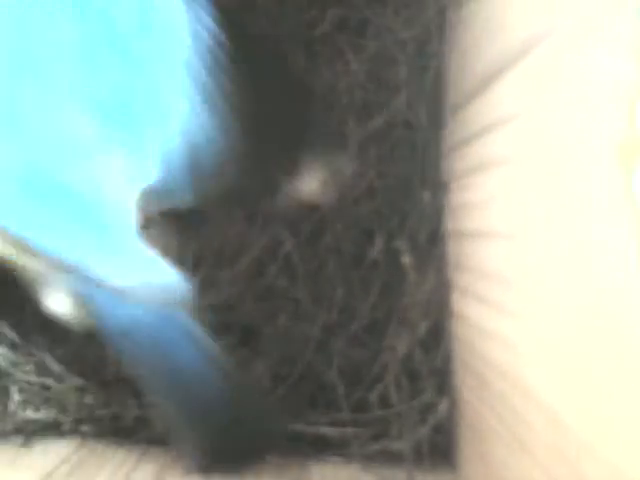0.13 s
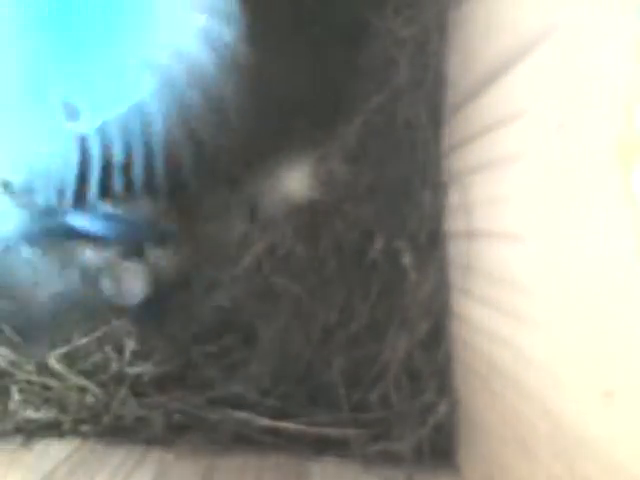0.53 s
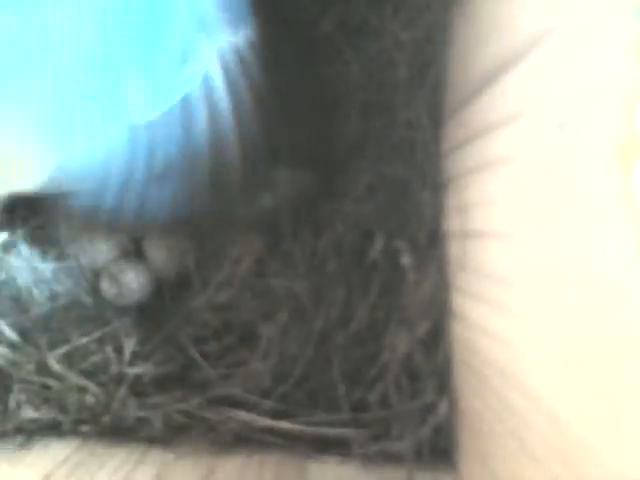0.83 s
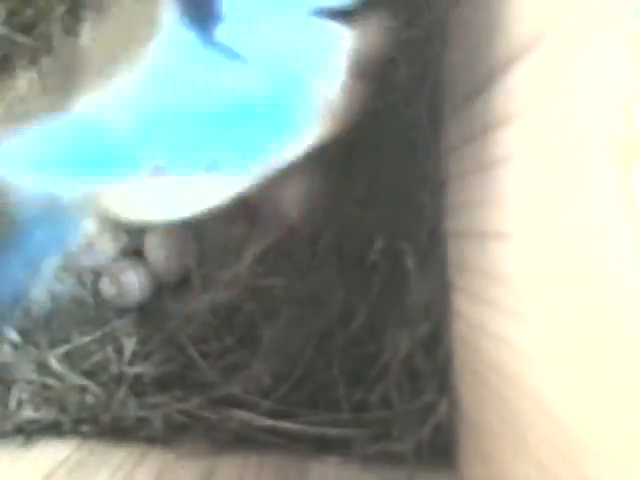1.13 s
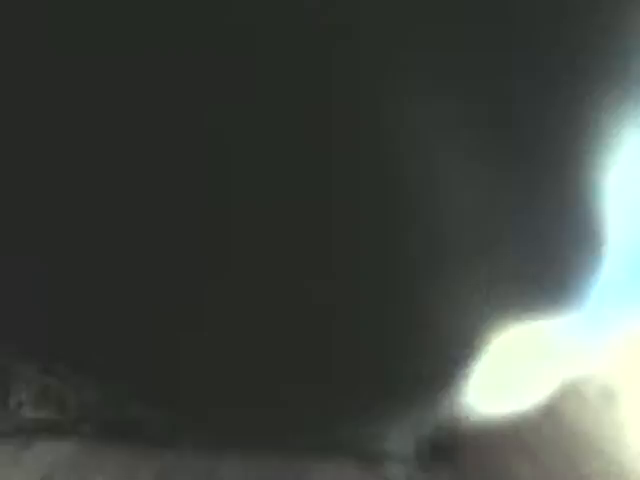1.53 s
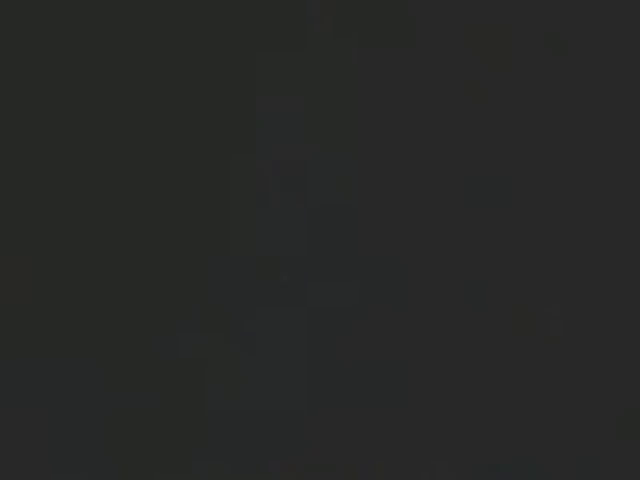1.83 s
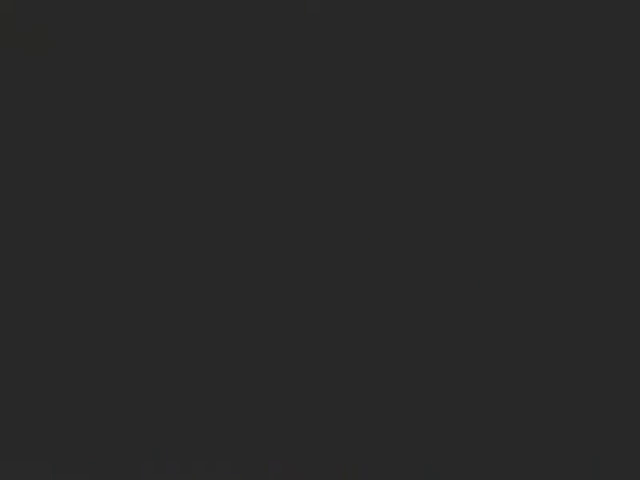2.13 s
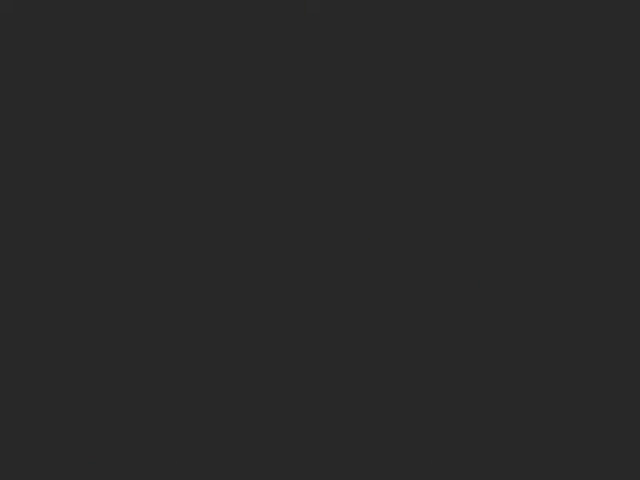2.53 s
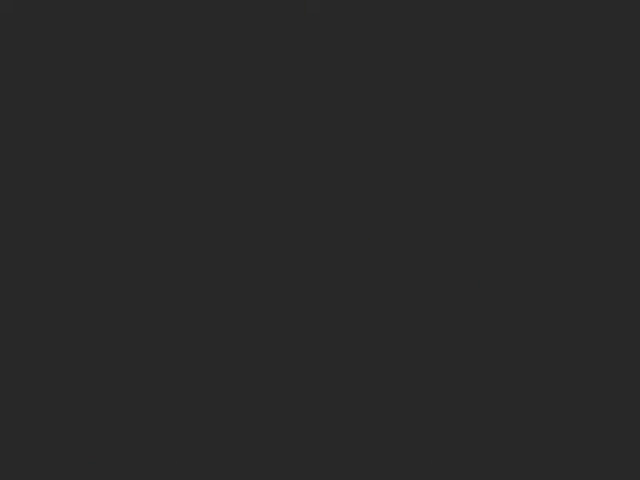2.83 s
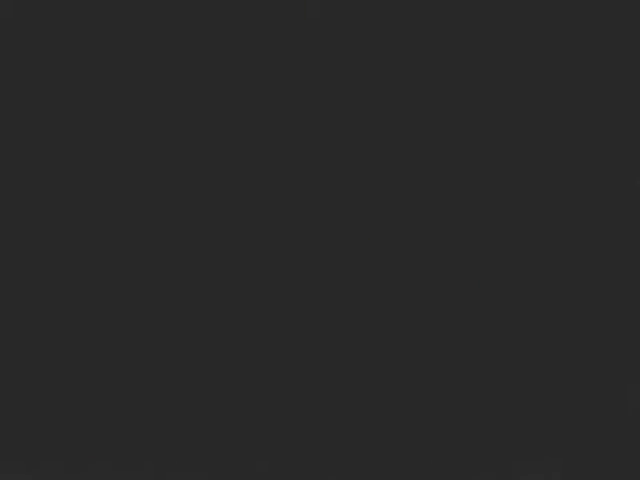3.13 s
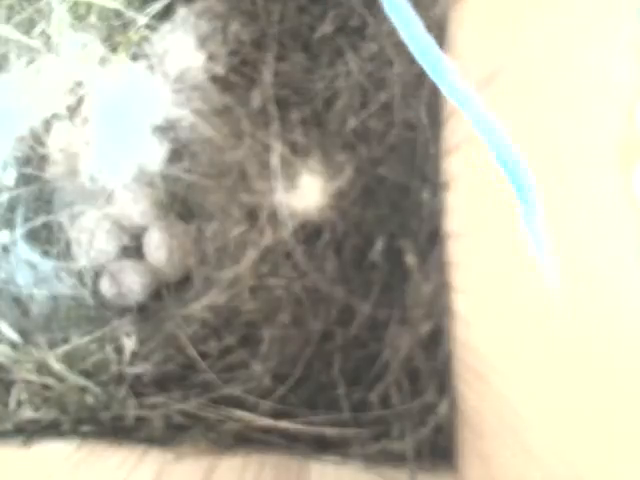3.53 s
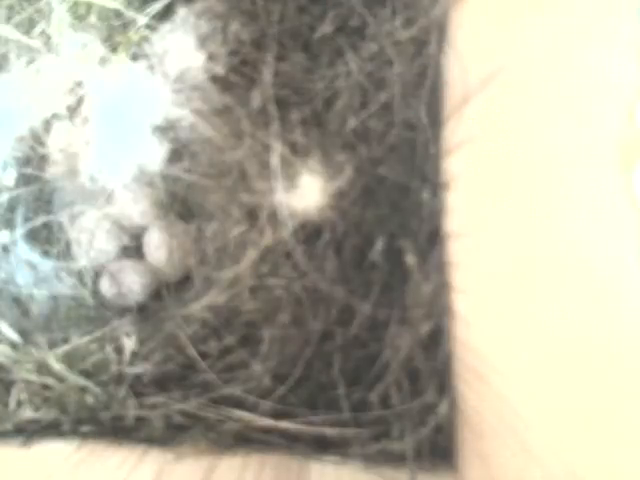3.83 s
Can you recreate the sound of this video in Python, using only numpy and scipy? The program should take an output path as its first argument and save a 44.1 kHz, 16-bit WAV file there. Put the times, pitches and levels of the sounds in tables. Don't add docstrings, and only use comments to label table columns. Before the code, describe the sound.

A small bird scuffles in a wooden nest box, close-miked: feathery hiss, woody rubbing and knocks at 0.3, 0.74 and 1.27 s, while a bird outside gives a falling whistle and quick trill until 0.5 s. Climbing bumps boom at 1.5-1.6 s. Near quiet follows, with faint ticks. Claws tap rapidly at 3.15-3.32 s, wings flutter away by 3.65 s, and a distant warble grows at the end.

```python
import sys
import numpy as np
from scipy import signal
from scipy.io import wavfile
from scipy.ndimage import uniform_filter1d

SR = 44100
rng = np.random.default_rng(int(sys.argv[2]) if len(sys.argv) > 2 else 0)


def to_linear_factor(level_db):
    exponent = np.asarray(level_db, float) / 20
    return 10 ** exponent


def master(y):
    cut = np.clip(np.atleast_2d(y).T, -1, 1)
    pcm = np.round(cut * 32767)
    wavfile.write(sys.argv[1], SR, pcm.astype(np.int16))


N = 176400


def rms_one(x):
    return x / np.sqrt(np.mean(x ** 2) + 1e-20)


def delayed(x, seconds):
    return np.pad(x, (int(seconds * SR), 0))[:N]


def drift(rate):
    step = 40
    r = np.exp(-2 * np.pi * rate * step / SR)
    slow = signal.lfilter([1], [1, -2 * r, r * r], rng.standard_normal(N // step + 2002))[2000:]
    return np.interp(np.arange(N) / step, np.arange(len(slow)), rms_one(slow))


def fade(t60):
    return to_linear_factor(-60 / (t60 * SR))


def ring(x, hz, t60):
    r, w = fade(t60), 2 * np.pi * hz / SR
    return signal.lfilter([0, np.sin(w)], [1, -2 * r * np.cos(w), r * r], x + 1e-18)


def peak(x, hz, width):
    r = np.exp(-np.pi * width / SR)
    top = np.array([1, 0, -1]) * (1 - r * r) / 2
    return signal.lfilter(top, [1, -2 * r * np.cos(2 * np.pi * hz / SR), r * r], x)


def cut(x, hz, kind, order=2):
    return signal.sosfilt(signal.butter(order, hz, kind, fs=SR, output="sos"), x)


def coloured(x, spectrum, patchy_db):
    out, sign = 0, 1
    hz, db = np.transpose(spectrum)
    edges = 28 * 2 ** np.arange(0, 9.4, 1 / 3)
    for low, high in zip(edges, edges[1:]):
        level = np.interp(np.log(low * high) / 2, np.log(hz), db)
        sign = -sign
        out = out + sign * to_linear_factor(level + patchy_db * drift(7.9)) * cut(x, [low, high], "band")
    return rms_one(out)


def grains(per_s, spread_db):
    sizes = to_linear_factor(spread_db * np.minimum(rng.exponential(1, N), 5)) * rng.choice([-1, 1], N)
    clicks = sizes * (rng.random(N) < per_s / SR)
    return rms_one(clicks + 0.07 * rng.standard_normal(N))


# [t/s, level/dB]
BUSTLE_LEVEL = [(0, -40), (.05, -59), (.12, -49), (1.15, -54), (1.38, -78), (1.5, -59.5), (1.63, -76.5),
                (1.7, -75), (1.9, -86.5), (3.09, -96.5), (3.14, -53), (3.45, -44.5), (3.52, -88)]


def strokes(rows, bustle_db):
    t = np.arange(N) / SR
    bustle = np.interp(t, *np.transpose(BUSTLE_LEVEL))
    power = to_linear_factor(bustle + bustle_db + 3.05 * drift(110)) ** 2
    for s, half, db in rows:
        near = slice(max(int((s - .1) * SR), 0), int((s + 0.14) * SR))
        side = np.where(t[near] < s, half * 0.89, half)
        away = np.abs(t[near] - s) / side
        power[near] += to_linear_factor(db - 12 * away ** 2.54) ** 2
    return np.sqrt(power)


def struck(rows, modes, spread_db, scrape_s, rough):
    s, db = np.transpose(rows)
    luck = rng.standard_normal((len(s), len(modes)))
    out = 0
    for k, (hz, level_db, t60) in enumerate(modes):
        clicks = np.zeros(N)
        clicks[(s * SR).astype(int)] = to_linear_factor(db + level_db + spread_db * luck[:, k]) * (-1) ** k
        scrape = signal.lfilter([1], [1, -fade(scrape_s)], clicks + 1e-18) * rng.standard_normal(N)
        out = out + ring(clicks + rough * scrape, hz, min(t60, .07))
    return out


def cracks(rows, gain_db, t60, low_hz):
    clicks = np.zeros(N)
    for s, db, *_ in rows:
        clicks[int(s * SR)] = to_linear_factor(db + gain_db)
    bright = cut(cut(rng.standard_normal(N), low_hz, "high"), 10000, "low", order=4)
    return signal.lfilter([1], [1, -fade(t60)], clicks + 1e-18) * bright


def tone(out, s, hz, gain):
    i = int(s * SR)
    n = min(len(hz), N - i)
    sine = np.sqrt(2) * gain * np.sin(2 * np.pi * np.cumsum(hz) / SR)
    return np.pad(sine[:n], (i, N - i - n)) + out


# [f/Hz, level/dB per Hz]
RUMBLE_COLOUR = [(18, -83), (30, -47), (58, -25), (287, -4.5), (499, -31), (1010, -32), (1590, -37.5),
                 (16000, -49.5)]
# [f/Hz, level/dB]
WHINE_TONES = [(2627, -93.5), (5286, -98.5), (7900, -98)]


def background():
    t = np.arange(N) / SR
    whine = 0
    for hz, db in WHINE_TONES:
        whine = whine + np.sqrt(2) * to_linear_factor(db + 2 * drift(10)) * np.sin(2 * np.pi * hz * t)
    box = to_linear_factor(-83.5) * rms_one(peak(rng.standard_normal(N), 1200, 130))
    return to_linear_factor(-62.5) * coloured(rng.standard_normal(N), RUMBLE_COLOUR, patchy_db=0) + whine + box


# [t/s, length/s, f/Hz, level/dB]
SMALL_PEEPS = [
    (3.494, 0.015, 1980, -49.5),
    (3.543, 0.026, 2100, -70),
    (3.908, 0.018, 10400, -64),
    (2.31, .02, 3700, -78),
    (.06, .012, 7500, -44),
    (1.566, 0.024, 1750, -30.5),
    (1.568, .018, 1560, -38),
    (2.55, .02, 1000, -68),
]


def far_birds():
    start_s, pitch_hz, swing_hz, swings_per_s = 3.865, 2170, 350, 42
    t = np.arange(N - int(start_s * SR)) / SR + start_s
    swing = signal.sawtooth(2 * np.pi * (swings_per_s * (t - 3.929) + 0.686), .7)
    swing = swing * np.clip((t - start_s - .03) * 200, 0, 1)
    gain = to_linear_factor(-54 + 50 * (t - 4)) * np.clip((t - start_s) * 25, 0, 1) ** 2
    gain = gain * to_linear_factor(6.1 * drift(78.3)[:len(t)])
    out = tone(0, start_s, pitch_hz + swing_hz * uniform_filter1d(swing, size=90), gain)
    out = out + to_linear_factor(-7) * (delayed(out, 0.0075) + delayed(out, 0.0038))
    for s, length, hz, db in SMALL_PEEPS:
        u = np.linspace(0, 1, int(length * SR))
        out = tone(out, s, hz * (1 + 0.046 * u), to_linear_factor(db) * np.sin(np.pi * u))
    return out


# [t/s, f/Hz, level/dB]
LEAD_WHISTLE = [
    (0, 8200, -37),
    (.014, 8180, -33),
    (.024, 7500, -33),
    (.028, 7300, -42),
    (.04, 7300, -44),
]
# [offset t/s, length/s, from f/Hz, to f/Hz, level/dB]
TRILL_SLIDES = [
    (0, .024, 5450, 6050, -2),
    (.012, .021, 4300, 6700, 0),
    (.026, .017, 5200, 6800, -1),
    (.036, .014, 5400, 6700, -5),
    (.009, .015, 6800, 8800, -6),
    (.003, .012, 6700, 8300, -9),
    (.02, .014, 7000, 8000, -9),
    (.03, .016, 6500, 6700, -6),
]


def singer():
    s, hz, db = np.transpose(LEAD_WHISTLE)
    t = np.arange(int(s[-1] * SR)) / SR
    gain = to_linear_factor(np.interp(t, s, db)) * np.minimum((t[-1] - t) * 200, 1)
    out = tone(0, 0, np.interp(t, s, hz), gain)
    for k, luck in enumerate(rng.standard_normal((5, len(TRILL_SLIDES)))):
        note_s = .074 + .0876 * k
        for (offset, length, from_hz, to_hz, db), z in zip(TRILL_SLIDES, luck):
            u = np.linspace(0, 1, int(length * SR))
            pitch = (from_hz + (to_hz - from_hz) * u) * (1 + 0.013 * z)
            out = tone(out, note_s + offset, pitch, to_linear_factor(-38.5 + db + 1.5 * z) * np.sin(np.pi * u))
    out = out * to_linear_factor(4 * drift(150))
    return out + to_linear_factor(-12) * (delayed(out, .0045) + delayed(out, .0087))


# [t/s, level/dB, f/Hz, t60/s]
AIR_BOOMS = [
    (1.483, -20.5, 315, 0.055),
    (1.508, -33.5, 270, 0.097),
    (1.547, -28, 270, 0.088),
    (1.612, -22, 290, 0.058),
    (1.765, -40.5, 196, 0.13),
    (2.511, -50, 201.4, 0.082),
    (3.173, -29.5, 252, 0.13),
    (3.231, -26, 252, 0.088),
    (3.344, -30.5, 273.5, 0.111),
    (3.915, -49, 190, 0.13),
]


def booms():
    t = np.arange(SR // 4) / SR
    out = 0
    for s, db, hz, t60 in AIR_BOOMS:
        out = tone(out, s, hz + 0 * t, to_linear_factor(db - 60 * t / t60) * np.minimum(t / .006, 1) ** 2)
    return out


# [t/s, level/dB]
AIR_PUFFS = [
    (0.011, -38.5),
    (0.308, -35),
    (0.511, -34.5),
    (0.74, -25),
    (0.938, -39.5),
    (1.488, -28.5),
    (1.575, -20.5),
    (3.376, -37),
    (3.447, -29),
]
# [t/s, half length/s, level/dB]
BOX_SWAYS = [
    (1.42, 0.024, -60),
    (1.48, 0.019, -41.5),
    (1.58, 0.042, -37),
    (1.75, 0.067, -58),
    (3.2, 0.034, -46),
    (3.45, 0.13, -47),
    (1.675, 0.017, -49.5),
]
# [t/s, peak level/dB]
WING_BEATS = [
    (3.367, -19),
    (3.442, -16),
    (3.515, -14),
    (3.563, -22),
    (3.617, -39.5),
    (3.665, -40),
]


def air():
    puffs = [(s, 0.012, db) for s, db in AIR_PUFFS]
    noise = strokes(puffs, -11.5) * rng.standard_normal(N)
    hollow = to_linear_factor(21.5) * cut(peak(noise, 299, 92), 150, "high")
    rocking = strokes(BOX_SWAYS, -32.5) * rms_one(cut(rng.standard_normal(N), [50, 230], "band"))
    cavity = [(303, 2.5, 0.054)]  # Hz, dB, t60 s
    beats = struck(WING_BEATS, cavity, spread_db=0, scrape_s=.01, rough=0)
    beats = cut(cut(beats, 295, "low", order=4), 127, "high")
    return hollow + rocking + booms() + beats


# [t/s, peak level/dB]
WALL_KNOCKS = [
    (0.304, -8),
    (0.492, -22),
    (0.738, -8),
    (0.744, -12.5),
    (0.83, -24.5),
    (1.2745, -12),
    (1.287, -26.5),
    (1.474, -28),
    (1.571, -21.5),
    (1.698, -33.5),
]
# [t/s, peak level/dB]
RIM_TAPS = [
    (3.1563, -24.5),
    (3.1685, -20),
    (3.2482, -16.5),
    (3.2612, -18.5),
    (3.2797, -15.5),
    (3.2948, -18.5),
    (3.32, -16.5),
]
# [t/s, peak level/dB]
STRAW_TICKS = [
    (1.39, -65),
    (1.398, -62),
    (1.697, -50),
    (1.767, -54),
    (1.772, -47),
    (2.1077, -61.5),
    (2.3687, -59),
]
# [f/Hz, level/dB, t60/s]
WALL_MODES = [(290, -11.5, .1), (519, -5.5, 0.083), (621, -2, 0.075), (780, -11, .04), (1026, 3.5, 0.041),
              (1106, -8.5, .04), (1836, -14, 0.033), (2540, -20, 0.037)]
# [f/Hz, level/dB, t60/s]
RIM_MODES = [(1060, -0.5, 0.021), (1690, -8, 0.013), (1903, -2.5, 0.031), (2548, -1, 0.025),
             (2995, -7, 0.025), (3150, -9, 0.015), (3740, -4, 0.015), (4130, -8.5, 0.018), (5040, -8, .012),
             (7210, -9.5, 0.032)]


def claws():
    knocks = struck(WALL_KNOCKS, WALL_MODES, spread_db=2.5, scrape_s=0.076, rough=0.078)
    knocks = cut(knocks, 320, "high")
    taps = struck(RIM_TAPS, RIM_MODES, spread_db=-0.5, scrape_s=0.014, rough=0.049)
    taps = cut(taps, 700, "high")
    taps = taps + to_linear_factor(-0.5) * delayed(taps, .0019)
    bright = cracks(RIM_TAPS, -8.0, 0.013, 3500) + cracks(STRAW_TICKS, -1, 0.017, 6860)
    return to_linear_factor(-12) * knocks + to_linear_factor(-8) * taps + bright


# [t/s, half length/s, level/dB]
WALL_RUBS = [(0.014, 0.0068, -29), (0.087, 0.0037, -51), (.15, 0.01, -42), (.24, 0.0087, -37.5),
             (0.273, 0.02, -36), (0.348, 0.013, -37), (0.436, 0.012, -40), (0.509, 0.029, -34.5),
             (0.568, 0.023, -35.5), (0.746, 0.012, -20), (0.794, 0.0036, -31.5), (0.851, 0.031, -27.5),
             (0.933, 0.027, -34.5), (1.005, 0.0063, -36), (1.065, 0.0056, -42), (1.165, 0.0052, -44),
             (1.481, 0.012, -23.5), (1.512, 0.0044, -40.5), (1.577, 0.011, -22), (1.618, 0.013, -35.5),
             (1.801, 0.017, -62.5), (3.122, 0.011, -52), (3.169, 0.01, -38.5), (3.204, 0.0089, -40),
             (3.24, 0.0089, -41), (3.371, 0.00977, -41.5), (3.433, 0.018, -33)]
# [f/Hz, width/Hz, level/dB]
BOX_TONES = [(317, 22, -11.5), (454.3, 70, -7.5), (640, 100, -5.5), (838, 120, -7), (1006, 84.6, 1),
             (1238, 260, -10.5), (1775, 210, -12), (2020, 160, -14), (2487, 210, -18.5)]


def rubbing():
    drive = strokes(WALL_RUBS, 2.2) * grains(3500, spread_db=3.0)
    drive = cut(drive, 2600, "low", order=6)
    out = 0
    for k, (hz, width, db) in enumerate(BOX_TONES):
        out = out + to_linear_factor(db + 3.25 * drift(2.7)) * peak(drive, hz, width) * (-1) ** k
    return to_linear_factor(19) * out


# [t/s, half length/s, level/dB]
FEATHER_STROKES = [(0.266, 0.11, -45), (0.363, 0.046, -45), (0.437, 0.044, -43), (0.51, 0.024, -36.5),
                   (0.576, 0.063, -46), (.656, 0.018, -36), (.709, 0.0032, -45), (0.75, 0.021, -28),
                   (0.85, 0.0097, -42.5), (0.885, 0.0097, -39.5), (.906, 0.0096, -39.5),
                   (.929, 0.012, -33.5), (.965, 0.035, -42), (.999, 0.019, -38), (1.059, 0.029, -36),
                   (1.19, 0.012, -50), (1.157, 0.016, -40.0), (1.257, 0.021, -36.5), (1.483, .015, -30.5),
                   (1.541, 0.0073, -44), (1.512, .013, -45.5), (1.577, .012, -28), (1.602, .012, -41.5),
                   (1.624, .003, -44), (1.613, 0.0033, -30), (1.75, 0.015, -55), (1.77, 0.0098, -45),
                   (1.79, 0.0042, -57.5), (1.801, 0.0051, -61), (3.136, 0.0098, -41),
                   (3.159, 0.0037, -28.5), (3.174, .013, -38), (3.363, 0.021, -44.5), (3.433, 0.015, -31),
                   (3.525, .018, -71.5)]
# [f/Hz, level/dB per Hz]
FEATHER_COLOUR = [(1470, -60.5), (2500, -5.5), (3260, -10), (4140, 3), (5070, -2), (7190, 6.5), (10500, -3),
                  (12000, -13), (15500, -24.5)]
# [from t/s, to t/s]
PRESSING_SPANS = [
    (0, 1.21),
    (1.44, 1.52),
    (1.56, 1.68),
    (1.795, 1.83),
    (3.1, 3.5),
]


def feathers():
    t = np.arange(N) / SR
    barbs = grains(9800, spread_db=4.0)
    hiss = cut(coloured(barbs, FEATHER_COLOUR, patchy_db=2.8), 3750, "high", order=8)
    tips = cut(hiss, 7300, "high", order=8) + to_linear_factor(-16) * hiss
    at_hole = t > 1.4
    middle = to_linear_factor(-2) * at_hole * cut(barbs, [1300, 4500], "band")
    pressing = sum((t >= start) & (t < end) for start, end in PRESSING_SPANS)
    return strokes(FEATHER_STROKES, 0) * to_linear_factor(2) * np.where(pressing, hiss + middle, tips)


def scene():
    outside = background() + far_birds() + singer()
    bird = air() + claws() + rubbing() + feathers()
    return (outside + bird)[None]


def roll_off(x):
    return signal.sosfilt(signal.butter(12, 16670, fs=SR, output="sos"), x)


def record(dry):
    mix = cut(dry, 57, "high")
    return roll_off(mix)


dry = scene()
out = record(dry)
master(out)
```